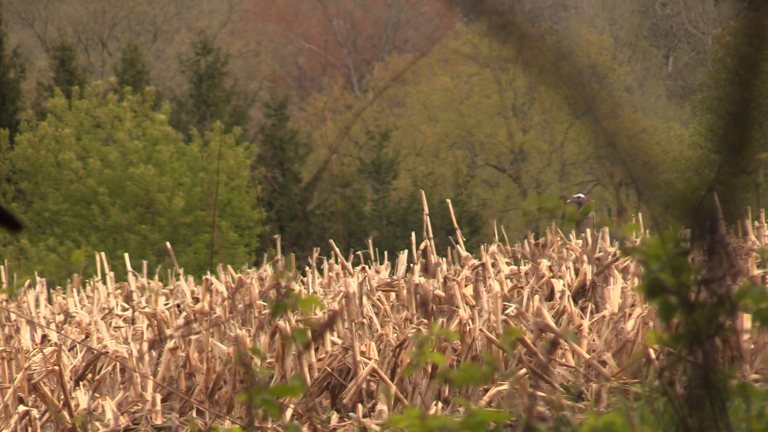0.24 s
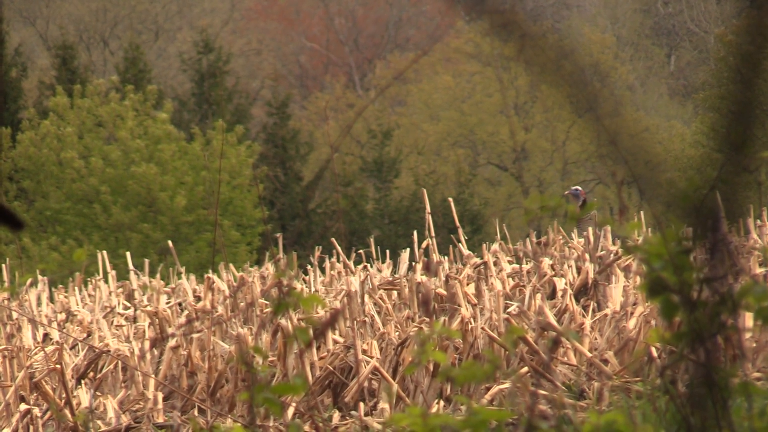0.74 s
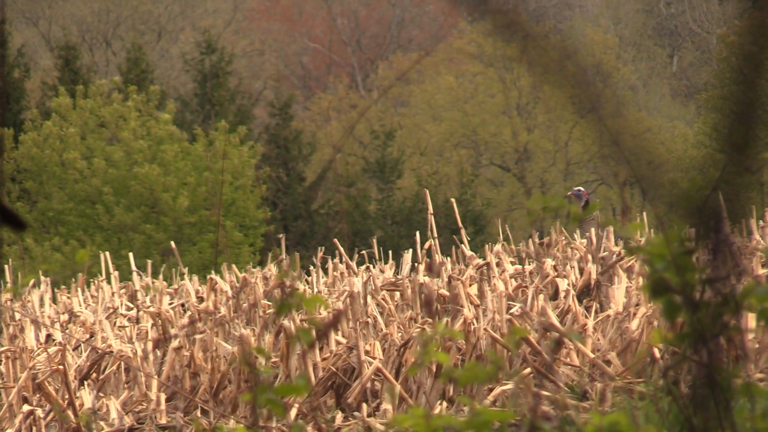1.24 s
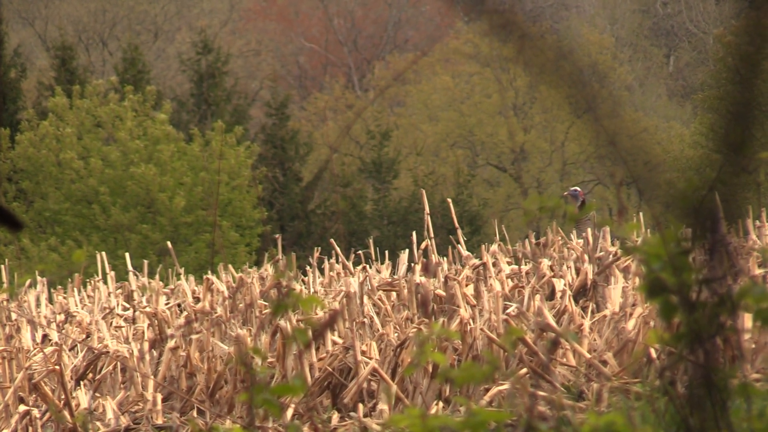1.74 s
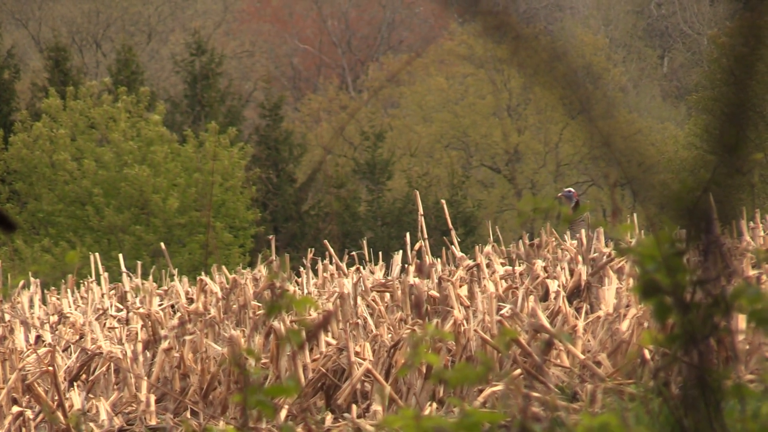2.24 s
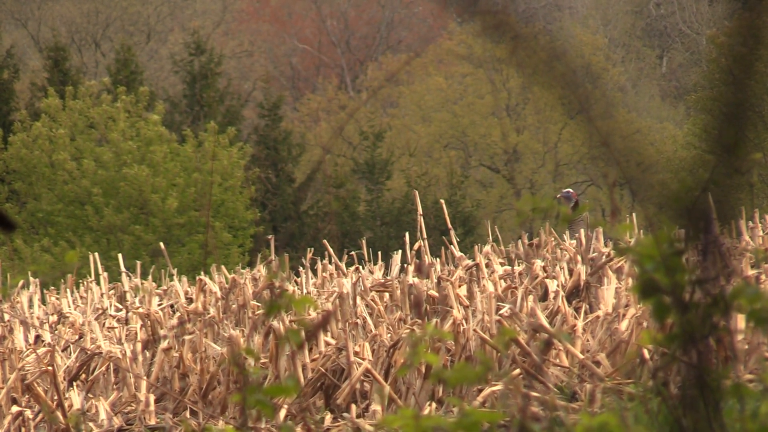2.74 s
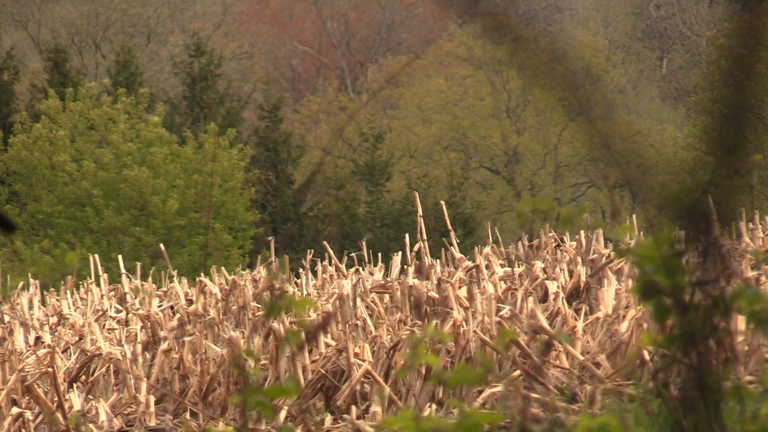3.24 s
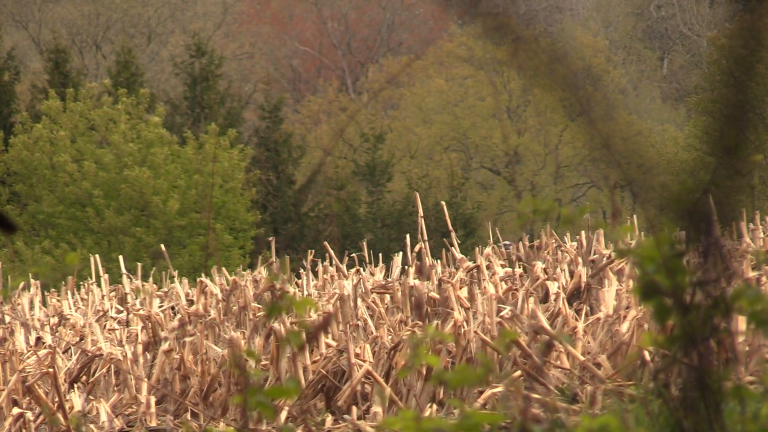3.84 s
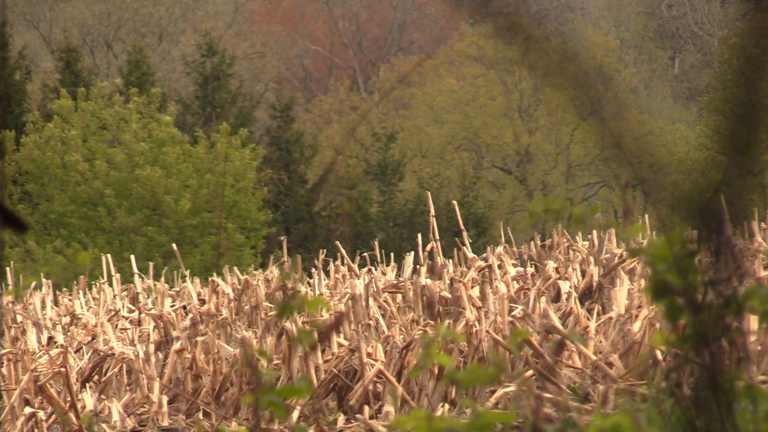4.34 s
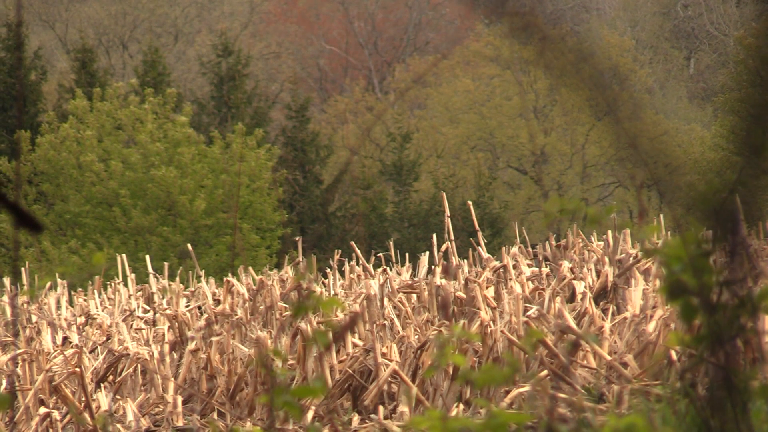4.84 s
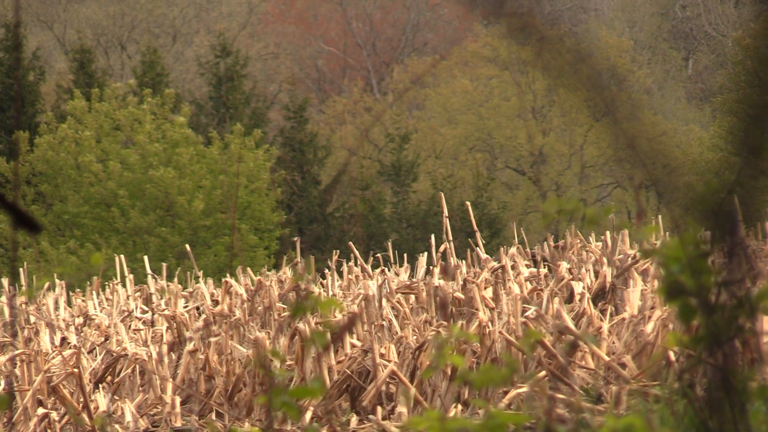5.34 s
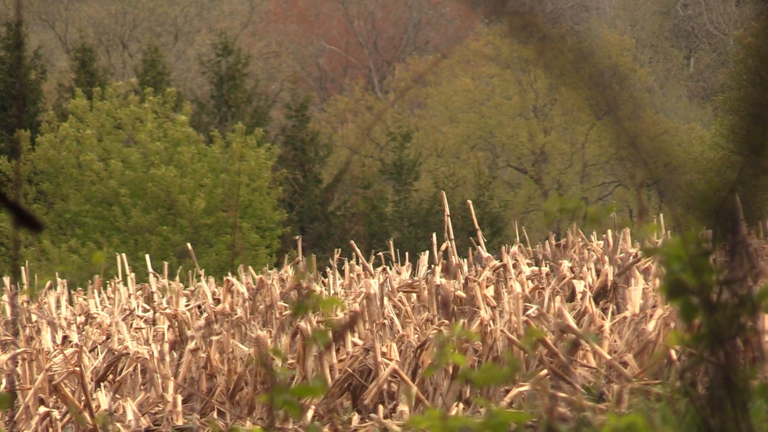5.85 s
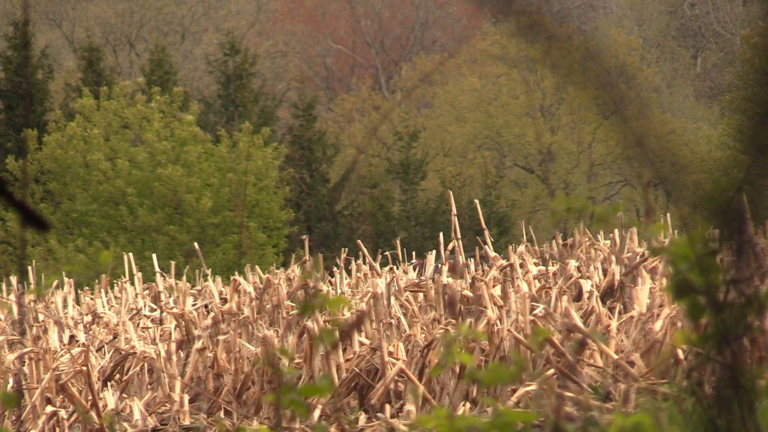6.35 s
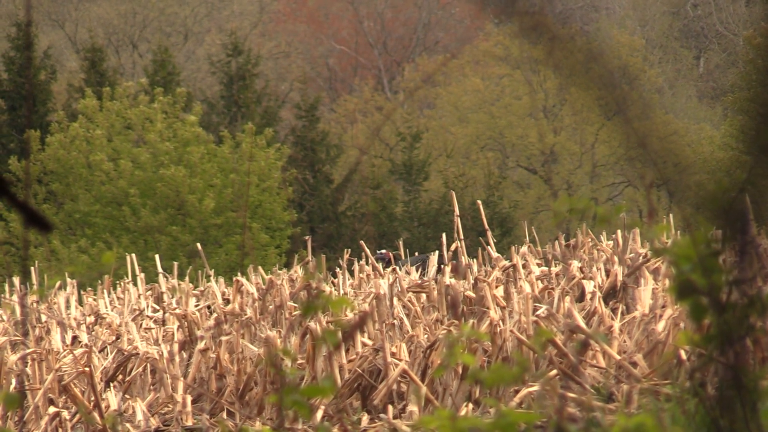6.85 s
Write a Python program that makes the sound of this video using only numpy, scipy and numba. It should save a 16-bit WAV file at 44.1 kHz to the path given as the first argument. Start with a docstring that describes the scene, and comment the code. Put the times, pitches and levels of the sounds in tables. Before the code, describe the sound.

Four quick, reedy turkey yelps, nasal and abruptly clipped, are made close to the microphone in open country, with a slight dull echo from trees. Then only soft distant rumble, faint hum and thin far chirps. A cluster of crackles and soft wet clicks precedes a short fluttering rattle; after another pause and more smacks comes a longer, harsher rattle. The background drops during calls and slowly returns afterwards.

```python
"""The edge of a corn field, with a hunter's turkey mouth call close by: four short yelps, two rattling purrs.
A membrane sings near 700 Hz into a throat that favours its octave; pushed, it breaks into two lines.
Far traffic and a motor hum fill the gaps, with dry crackles, wet smacks and two far bird chirps.
A gain control ducks the background at each call and lets it creep back."""
import sys
import numpy as np
from scipy import signal
from scipy.fft import rfft, irfft, next_fast_len
from scipy.io import wavfile
from scipy.ndimage import uniform_filter1d
from numba import njit

SR = 44100
rng = np.random.default_rng(int(sys.argv[2]) if len(sys.argv) > 2 else 0)


def unload_audio(sound):
    """Save the sound as a 16-bit wav file, at the path given as the first command line argument."""
    columns = np.transpose(np.atleast_2d(sound))
    # keep every value between -1 and 1, then stretch to whole-number steps
    steps = np.round(np.clip(columns, -1, 1) * 32767)
    wavfile.write(sys.argv[1], SR, steps.astype(np.int16))


N = 313110
TIME = np.arange(N) / SR


def undb(db):
    """Decibels to amplitude."""
    return 10 ** (np.asarray(db) / 20)


def level(x, db):
    """Scale a signal to an RMS level in dB."""
    return x * undb(db) / np.sqrt(np.mean(x ** 2))


def shape(x, gain):
    """Filter by a gain that is a function of frequency."""
    size = next_fast_len(len(x))
    hz = np.arange(size // 2 + 1) * SR / size + 1  # 1 Hz up, to keep clear of zero
    return irfft(rfft(x, size) * gain(hz), size)[:len(x)]


def points(table):
    """Gain drawn through (Hz, dB) points on a logarithmic frequency scale."""
    hz, db = np.transpose(table)
    return lambda f: undb(np.interp(np.log(f), np.log(hz), db))


def modes(table):
    """Gain of parallel resonances, each a bell around its centre."""
    return lambda f: sum(undb(db) / (1 + (2 * (f - hz) / width) ** 2) ** 1.3 for hz, width, db in table)


def walk(rate):
    """Random levels held 1 / rate s and slewed twice; spread 1."""
    k = int(SR / rate)
    steps = np.repeat(rng.standard_normal(N // k + 1), k)
    x = uniform_filter1d(uniform_filter1d(steps, k), k)[:N]
    return x / x.std()


def curve(s, values, smooth_s=.002):
    """Straight lines between breakpoints, with rounded corners."""
    return uniform_filter1d(np.interp(TIME, s, values), int(smooth_s * SR))


# relative spectrum of the far rumble and hiss: pitch_hz, density_db (per Hz)
FIELD_SPECTRUM = [(12, -48.5), (20, -19.5), (70, 1), (87, -0.5), (132, -7), (189, -9), (223, -18.5),
                  (310, -13), (445, -19.5), (511, -16.5), (1460, -37), (8860, -44.5), (10800, -43),
                  (13100, -47.5), (15000, -82.5)]
# swell of far traffic: time_s, swell_db
TRAFFIC_SWELL = [(0, 0), (1.1, -1.5), (2.5, -2), (4.2, 1), (5.1, -1), (5.8, 2.5), (7.1, -2)]
FIELD_DB = -62.5  # RMS before the swells


def field():
    """Far traffic: noise cut into bands whose levels swell apart."""
    noise = level(shape(rng.standard_normal(N), points(FIELD_SPECTRUM)), FIELD_DB)
    swell_db = curve(*np.transpose(TRAFFIC_SWELL))
    out = np.zeros(N)
    # low Hz, high Hz, share of the traffic swell
    for lo, hi, share in [(0, 60, 1), (60, 140, 1), (140, 400, 1), (400, 1500, .5), (1500, SR, 0)]:
        band = shape(noise, lambda f: (f > lo) & (f <= hi))
        out += undb(share * swell_db + 1.6 * walk(3.1)) * band
    return out


# level of the motor hum around which it wavers: time_s, level_db
MOTOR_LEVEL = [(0, -98), (1.1, -79), (2.3, -70.5), (3.0, -72), (3.9, -66.5), (4.6, -69.5), (5.2, -85),
               (7.1, -93)]
MOTOR_HZ = 191.3


def motor():
    """A motor hum: one sine that wavers in pitch and level."""
    phase = 2 * np.pi * np.cumsum(MOTOR_HZ * (1 + 0.004 * walk(0.91))) / SR
    return np.sqrt(2) * np.sin(phase) * undb(curve(*np.transpose(MOTOR_LEVEL)) + 1.4 * walk(3.5))


def add_ring(out, s, db, hz, t60):
    """Add a struck ring that dies away by 60 dB in t60 seconds."""
    t = TIME[:SR // 8]
    # a wandering phase turns the ring into a crackle, more so in the treble
    wander = np.cumsum(rng.standard_normal(len(t))) * hz / 15000
    onset = 1 - np.exp(-t * hz * 11.6)
    ring = np.sin(2 * np.pi * hz * t + wander) * undb(-60 * t / t60) * onset
    out[int(s * SR):][:len(t)] += undb(db) * ring


# dry crackles: time_s, level_db, pitch_hz
CRACKLE_HITS = [(.99, -59, 910), (2.315, -65.5, 2510), (3.81, -65, 4050), (4.232, -53.5, 2570),
                (4.245, -58.5, 1200), (4.263, -57, 1730), (4.268, -53.5, 3600), (4.272, -54, 6000),
                (4.283, -54, 4340), (4.42, -55, 4040), (4.481, -65, 1780), (4.504, -63, 1490),
                (4.518, -62, 4030)]
CRACKLE_CYCLES = 20  # to die away by 60 dB


def crackles():
    """Dry crackles: single rings that last a fixed number of cycles."""
    out = np.zeros(N)
    for s, db, hz in CRACKLE_HITS:
        add_ring(out, s, db, hz, CRACKLE_CYCLES / hz)
    return out


# the mouth resonance moves with the tongue: time_s, centre_hz
MOUTH_PATH = [(1.13, 3950), (1.45, 4238), (1.76, 3917), (2.07, 3866), (4.74, 3639), (4.8, 3688),
              (4.9, 3252), (5.0, 3360), (6.25, 2838), (6.35, 3050), (6.55, 3028), (6.59, 3480),
              (6.85, 3236)]
MOUTH_WIDTH_HZ = 190


def mouth(x):
    """Moving resonance: shift its centre to zero, low-pass, shift back."""
    turn = 2 * np.pi * np.cumsum(curve(*np.transpose(MOUTH_PATH))) / SR
    out = np.zeros(N)
    for wave in (np.cos(turn), np.sin(turn)):
        out += wave * shape(x * wave, lambda f: 1 / (1 + (2 * f / MOUTH_WIDTH_HZ) ** 2))
    return out


THROAT_TOP_HZ = 1670


def membrane(hz, multiple, low, upper, treble, rough, colour, mouth_db,
             wobble=0.048, flutter_db=14.0, air=.15, chaos=2.5):
    """Low line, upper line and a buzz of overtones; roughness shakes pitch, chokes cycles, swaps buzz for hiss."""
    step = 2 * np.pi * hz / SR
    slow = np.cumsum(step * (1 + wobble * rough * walk(700)))
    fast = np.cumsum(step * multiple * (1 + wobble * rough * walk(700)))
    lines = low * undb(-flutter_db * rough * walk(350) ** 2) * np.sin(slow)
    # the throat lets little through above its first resonance
    passed = upper / np.sqrt(1 + (hz * multiple / THROAT_TOP_HZ) ** 16)
    lines += passed * undb(-flutter_db * rough * walk(350) ** 2) * np.sin(fast)
    buzz = level(sum(np.cos(k * fast / 2 + k * k) for k in range(3, 19)), 0)
    # air puffs in step with the low line
    hiss = level(rng.standard_normal(N) * (1 + np.cos(slow)), 0)
    hiss_share = np.clip(air + chaos * rough, 0, 1)
    source = np.sqrt(1 - hiss_share) * buzz + np.sqrt(hiss_share) * hiss
    coloured = level(shape(source, colour), 0) + level(mouth(source), mouth_db)
    return np.sqrt(2) * lines + treble * coloured


# one row a yelp, times counted from its start, levels before the shaping below: start_s, attack_s, leap_s,
# end_s, pre_leap_hz, leap_hz, locked_hz, octave_db, low_line_db, treble_db, closing_peep_db,
# roughness until the note locks (0-1, on top of a little throughout)
YELP_NOTES = [(1.127, 0.013, .020, .050, 645, 725, 721, -5.5, -18.5, -31, -52.5, 0.1),
              (1.431, .015, .021, 0.065, 689.3, 784, 730.6, -9.5, -23.5, -38.5, -49, 0.1),
              (1.739, .013, .029, .067, 725, 820, 769.6, -9, -19.5, -35, -38.5, .25),
              (2.035, .011, 0.033, 0.064, 700, 950, 757, -14, -18.5, -38, -36.5, .35)]
# relative treble colour of the yelps: pitch_hz, gain_db
YELP_SPECTRUM = [(1060, -24), (1800, -0.5), (2350, -1.5), (2930, -6), (4410, 0), (5860, -17.5),
                 (6460, -16.5), (7710, -19), (8810, -10.5), (10300, -27), (11900, -18.5), (14000, -35.5),
                 (15000, -65)]
# cracks, where the two lines draw together and turn rough: time_s, length_s, low_line_db
YELP_CRACKS = [(1.757, .010, -14), (2.05, .014, -15)]
CRACK_HZ, CRACK_MULTIPLE, CRACK_ROUGH, YELP_ROUGH = 1061, 1.1, 0.64, 0.05
LEAP_S, SETTLE_S, SETTLE_HZ_PER_S, END_SAG = .006, .005, 33000, 0.87
PEEP_AFTER_S, PEEP_S, PEEP_HZ, PEEP_ROUGH = .011, .004, 942, .5
PEEP_HISS_DB, PEEP_HISS_S = -25, .012  # air that trails off after a yelp, below its treble
LOW_START_DB, STOP_S = -18, 0.0054
OCTAVE_RISE, OCTAVE_FADE, TREBLE_RISE, TREBLE_FADE = 2.4, 0.9, 2.0, 1  # exponents of the ramps
# change of octave and low line per doubling of pitch above the locked note
LEAP_CHOKE_DB, LEAP_LIFT_DB = -48.5, 12.5


def yelps():
    """Each yelp starts on the octave, may crack, leaps in pitch, then locks and fades from the top."""
    pitch = []
    low, upper, treble, peep, rough, locked = np.zeros((6, N))
    for (s, attack, leap, end, start_hz, leap_hz, hz,
         octave_db, low_db, treble_db, peep_db, harsh) in YELP_NOTES:
        lock = leap + SETTLE_S + (leap_hz - hz) / SETTLE_HZ_PER_S
        pitch += [(s + leap - LEAP_S, start_hz), (s + leap, leap_hz),
                  (s + lock, hz), (s + end - STOP_S, hz), (s + end, END_SAG * hz),
                  (s + end + PEEP_AFTER_S / 2, PEEP_HZ), (s + end + 3 * PEEP_AFTER_S, PEEP_HZ)]
        t = TIME - s
        ramp = np.clip(t / attack, 0, 1)
        rise, stop = ramp ** OCTAVE_RISE, np.clip((end - t) / STOP_S, 0, 1)
        left = np.clip((end - t) / (end - lock), 0, 1)
        low += undb(low_db + LOW_START_DB * np.clip(1 - t / leap, 0, 1)) * rise * stop
        upper += undb(octave_db) * rise * left ** OCTAVE_FADE
        trail = undb(PEEP_HISS_DB) * (t > lock) * np.exp(-np.maximum(t - end, 0) / PEEP_HISS_S)
        treble += undb(treble_db) * (ramp ** TREBLE_RISE * left ** TREBLE_FADE + trail)
        rough += harsh * (t > 0) * np.clip((lock - t) / SETTLE_S, 0, 1)
        locked += hz * (t > 0) * (t < end)
        peep += undb(peep_db) * np.exp(-.5 * ((t - end - PEEP_AFTER_S) / PEEP_S) ** 2)
    hz = curve(*np.transpose(pitch))
    # above its locked note the membrane loses the octave and feeds the low line
    octaves_over = np.log2(np.maximum(hz / np.where(locked > 0, locked, hz), 1))
    low = low * undb(LEAP_LIFT_DB * octaves_over)
    upper = upper * undb(LEAP_CHOKE_DB * octaves_over)
    cracks = np.array([np.cos(np.pi * np.clip((TIME - s) / length, -.5, .5))
                       for s, length, db in YELP_CRACKS])
    low = np.maximum(low, undb(np.array(YELP_CRACKS)[:, 2]) @ cracks)
    crack = cracks.sum(axis=0)
    rough = YELP_ROUGH + np.maximum(rough, CRACK_ROUGH * crack) + PEEP_ROUGH * (locked == 0)
    hz = hz + (CRACK_HZ - hz) * crack
    multiple = 2 + (CRACK_MULTIPLE - 2) * crack
    return membrane(hz, multiple, low + peep, upper, treble, rough, points(YELP_SPECTRUM),
                    mouth_db=-11.0, flutter_db=13.5, air=0.12, chaos=1.2)


def air_thumps(yelp, purr):
    """Each push of air thumps the microphone far below the call: the call's power, band-passed low."""
    push = undb(2.0) * yelp ** 2 + undb(16.5) * purr ** 2
    return undb(-15.5) * shape(push, lambda f: 1 / (1 + (f / 250) ** 2) / (1 + (32 / f) ** 2))


def smear(calls, tail):
    """Spread the calls over a noise tail of unit energy."""
    return signal.fftconvolve(calls, tail / np.sqrt(np.sum(tail ** 2)))[:N]


BRUSH_DB, BRUSH_T60_S = -29, 0.13


def brush_smear(calls):
    """The brush close by smears the end of every note with a short decaying noise tail."""
    t = TIME[:SR // 8]
    tail = rng.standard_normal(len(t)) * undb(-60 * t / BRUSH_T60_S) * (t > .004)
    return undb(BRUSH_DB) * smear(calls, tail)


ECHO_DB, ECHO_T60_S = -59.5, .9


def tree_echo(calls):
    """The tree line sends back a faint, dull tail of low-passed, decaying noise."""
    t = TIME[:SR]
    tail = rng.standard_normal(SR) * undb(-60 * t / ECHO_T60_S) * (t > .015)
    return undb(ECHO_DB) * smear(calls, shape(tail, lambda f: 1 / (1 + (f / 2500) ** 2)))


# wet smacks near the microphone: time_s, level_db, upper_ring_db (added above 2 kHz)
SMACK_HITS = [(2.393, -49.5, 4.5), (4.235, -39.5, -7.5), (4.251, -43, -9), (4.683, -40.5, -20),
              (5.097, -45, -2), (6.044, -50, -15), (6.081, -46, -25), (6.138, -45.5, -14),
              (6.162, -41.5, -15), (6.19, -36.5, -20), (6.911, -50, 3)]
# rings that make up every smack: pitch_hz, relative_db, t60_s
SMACK_RINGS = [(336, -2.5, 0.028), (750, -5.5, 0.0087), (2490, -28.5, .05), (4100, -21.5, .07)]


def smacks():
    """Wet smacks: four damped rings struck together."""
    out = np.zeros(N)
    for s, db, upper_db in SMACK_HITS:
        for hz, ring_db, t60 in SMACK_RINGS:
            add_ring(out, s, db + ring_db + upper_db * (hz > 2000), hz, t60)
    return out


# a small bird far off: start_s, length_s, start_hz, end_hz, peak_db
BIRD_CHIRPS = [(2.486, 0.052, 6500, 7330, -74), (4.188, 0.035, 6430, 7000, -77)]


def bird():
    """Two thin rising chirps, gliding sines smeared by a leafy noise tail."""
    chirps = np.zeros(N)
    for s, length, start_hz, end_hz, db in BIRD_CHIRPS:
        u = np.clip((TIME - s) / length, 0, 1)
        phase = 2 * np.pi * np.cumsum(start_hz + (end_hz - start_hz) * u) / SR
        chirps += undb(db) * np.sin(np.pi * u) * np.sin(phase)
    leaves = rng.standard_normal(SR // 4) * undb(-60 * TIME[:SR // 4] / 0.5)
    return chirps + 0.037 * signal.fftconvolve(chirps, leaves)[:N]


# one row a beat of the purr, times counted from its opening, levels before the shaping below:
# opening_s, squeeze_s, length_s, squeeze_db, opening_db, octave_db, squeeze_hz
PURR_BEATS = [(4.737, 0.0055, .014, -30, -32, -30.5, 619.4), (4.7639, .011, .017, -23, -27, -28, 890.6),
              (4.7996, .010, .021, -23, -24.5, -26, 942), (4.8336, .008, .011, -21, -24, -24, 994.7),
              (4.8464, .007, .011, -22, -25.5, -29.5, 949), (4.8714, .006, .018, -17.5, -29, -25, 1042),
              (4.9024, .008, 0.019, -15.5, -28, -25, 999.7), (4.9322, .006, .019, -17, -28.5, -22.5, 975.6),
              (4.9654, 0.0055, .017, -18.5, -33.5, -26, 946), (5.0038, 0.0069, .014, -36, -36.5, -35, 760),
              (6.206, .004, .012, -40, -45, -47.5, 587.4), (6.2327, .010, .015, -30, -31, -36, 840),
              (6.2646, .010, .016, -27.5, -24, -38, 859.7), (6.2938, .010, .020, -28.5, -22, -39, 915.3),
              (6.326, .008, .019, -22, -23, -37, 1014), (6.3619, 0.0065, .016, -19.5, -24.5, -28, 1082),
              (6.4, .006, .015, -20.5, -24, -28, 1041), (6.4304, .005, .019, -20.5, -21, -27, 1095),
              (6.465, .004, .016, -18.5, -24, -23, 1058), (6.4978, .005, .014, -17.5, -22.5, -25, 1050),
              (6.5293, .005, .017, -19.5, -30.5, -30, 948), (6.556, .004, .0156, -26, -24.5, -33, 912.6),
              (6.587, .004, .0114, -22, -38.5, -36.5, 852), (6.6084, 0.0041, .018, -23, -23.5, -27, 802),
              (6.6358, 0.0056, .0175, -22, -31, -25.5, 858.6),
              (6.6656, 0.0035, 0.014, -22.5, -25, -26.5, 866.4),
              (6.6963, 0.0068, 0.0092, -19, -29, -29.5, 890.5), (6.72, .005, .015, -20.5, -37, -26.5, 885),
              (6.749, 0.0041, .014, -21, -29.5, -28, 873), (6.7767, .005, 0.015, -22, -27, -27.5, 933),
              (6.802, .006, .018, -22.5, -31, -29, 886), (6.8346, .004, 0.011, -24.5, -25.5, -35, 829)]
# along the purrs: time_s, opening_hz (on which the beats open), roughness (0-1)
PURR_OPENING = [(4.739, 603.8, 0.2), (4.8, 640.3, .2), (4.85, 677.7, 0.4), (4.9, 672.4, .12),
                (5.0, 664.5, .1), (6.2, 555, .12), (6.301, 650, .15), (6.33, 688.2, .42),
                (6.402, 740.7, .48), (6.53, 677, 0.6), (6.561, 664.6, .15), (6.65, 621.5, .15),
                (6.842, 639, .15)]
# relative throat resonances in the purr: centre_hz, width_hz, gain_db
PURR_RESONANCES = [(1175, 3100, 7), (2120, 2400, 0), (3010, 610, -6.5), (5470, 450, -16),
                   (6900, 3000, -25.5), (8400, 550, -14), (10480, 670, -13), (12420, 750, -9)]
# a fixed resonance higher in the head: centre_hz, width_hz, gain_db
NASAL_RESONANCE = (4500, 450, -6)
RISE_S, OCTAVE_S = 0.0072, 0.0022
HOLD = .35  # share of the way to the squeeze for which the opening note keeps its pitch
SAG_AT = 0.8  # share of the way from squeeze to close
SQUEEZE_SAG, CLOSE_SHARE = 0.98, .4  # pitch ratio, share of the way from opening to squeeze pitch
GAP_DB, CLOSE_DB = -26.5, -8  # relative to the squeeze
SWELL_DB, SQUEEZE_TREBLE_DB = 2.2, 3.5  # lift in mid-squeeze
PURR_OCTAVE_DB, SLIDE_DB, CLOSING_OCTAVE_DB = -21, 16, -9.5  # base, per unit roughness, at the close
PURR_TREBLE_DB, STRAIN_TREBLE_DB = -33, 10.5  # base, per unit roughness
OCTAVE_SLIDE = 1.6  # fall of the upper line's multiple per unit roughness
UNDER_DB = -7.0


def purrs():
    """Every beat opens low with a strong octave, is squeezed up in pitch and sags as it closes."""
    start, squeeze, length, squeeze_db, open_db, octave_db, top_hz = np.transpose(PURR_BEATS)
    # columns: rise begins, opening, squeeze, sag, close
    s = start[:, None] + np.column_stack(
        [0 * start, 0 * start, squeeze, squeeze + SAG_AT * (length - squeeze), length])
    after_last_close = np.append(0, s[:-1, 4]) + .002
    s[:, 0] = np.minimum(np.maximum(start - RISE_S, after_last_close), start - .002)
    when, pitch, roughness = np.transpose(PURR_OPENING)
    open_hz = np.interp(start, when, pitch)
    strain = np.interp(start, when, roughness).clip(0, .6)
    close_hz = open_hz + CLOSE_SHARE * (top_hz - open_hz)
    hz = np.column_stack([open_hz, open_hz, top_hz, SQUEEZE_SAG * top_hz, close_hz])
    db = np.column_stack([squeeze_db + GAP_DB, open_db, squeeze_db, squeeze_db, squeeze_db + CLOSE_DB])
    gate, octave, swell = np.zeros((3, N))
    for k in range(len(s)):
        gate[int(s[k, 0] * SR):int((s[k, 4] + .012) * SR)] = 1
        octave += undb(octave_db[k]) * np.exp(-.5 * ((TIME - s[k, 1]) / OCTAVE_S) ** 2)
        swell += np.sin(np.pi * np.clip((TIME - s[k, 2]) / (s[k, 3] - s[k, 2]), 0, 1))
    # after the last beat of a run the membrane stops within a few cycles
    last = np.append(np.diff(start) > .1, True)
    ends = s[last, 4] + 0.0046
    times = np.append(s, ends)
    order = np.argsort(times)
    low = curve(times[order], np.append(undb(db), 0 * ends)[order]) * curve(TIME, gate)
    low *= undb(SWELL_DB * swell)
    rough = curve(s[:, 2], strain)
    # in rough beats the octave slides down into the squeezed note
    multiple = np.full(s.shape, 2.)
    multiple[:, 2:4] -= OCTAVE_SLIDE * strain[:, None]
    closing = curve(s.ravel(), np.tile([1, 0, 0, 1, 1], len(s)))
    upper = octave + undb(PURR_OCTAVE_DB + SLIDE_DB * rough + CLOSING_OCTAVE_DB * closing) * low
    drive = curve(TIME, low * undb(SQUEEZE_TREBLE_DB * swell) + 0.76 * octave, 0.003)
    treble = undb(PURR_TREBLE_DB + STRAIN_TREBLE_DB * rough) * drive
    # in rough beats the opening note keeps sounding under the squeezed one
    held = np.sin(2 * np.pi * np.cumsum(curve(s[:, 1], hz[:, 1])) / SR)
    under = undb(UNDER_DB) * np.clip(rough - .15, 0, 1) * low * held
    pitch_s = s.copy()
    pitch_s[:, 1] += HOLD * (s[:, 2] - s[:, 1])
    return under + membrane(curve(pitch_s.ravel(), hz.ravel()), curve(s.ravel(), multiple.ravel()),
                            low, upper, treble, rough, modes(PURR_RESONANCES + [NASAL_RESONANCE]),
                            mouth_db=-6.0, air=0.6, chaos=1.6, wobble=.05, flutter_db=3.0)


def scene():
    """Mix calls, their surroundings and the background, with a faint flickering stereo side."""
    yelp, purr = yelps(), purrs()
    calls = yelp + purr
    mono = calls + brush_smear(calls) + tree_echo(calls) + air_thumps(yelp, purr)
    mono += field() + motor() + crackles() + smacks() + bird()
    side = undb(-37) * np.roll(mono, 30) * walk(40)
    return np.array([mono + side, mono - side])


@njit
def ride(want, start, top, attack, release):
    """Gain in dB drops fast, creeps back slowly and stops at its top."""
    out, g = np.empty(len(want)), start
    for i in range(len(want)):
        g = min(top, g + (want[i] - g) * (attack if want[i] < g else release))
        out[i] = g
    return out


GAIN_MAX_DB, GAIN_START_DB, GAIN_KNEE_DB, GAIN_SLOPE, GAIN_PULL_DB = 12, 7, -33, 0.64, 4
ATTACK_S, RELEASE_S, SENSE_HZ = 0.0068, 0.69, 1200
CEILING, TOP_HZ = .74, 15235


def record(dry):
    """Gain control that hears mostly the upper range, a soft ceiling and a steep top cut."""
    sensed = shape(dry.mean(axis=0), lambda f: 1 / np.sqrt(1 + (SENSE_HZ / f) ** 8))
    loud_db = 10 * np.log10(uniform_filter1d(sensed ** 2, 200).clip(1e-12))
    over_db = loud_db - GAIN_KNEE_DB
    # in quiet the gain is pulled past its top, so it gets there in good time
    want = np.where(over_db > 0, GAIN_MAX_DB - GAIN_SLOPE * over_db, GAIN_MAX_DB + GAIN_PULL_DB)
    gain_db = ride(want, GAIN_START_DB, GAIN_MAX_DB, 1 / (ATTACK_S * SR), 1 / (RELEASE_S * SR))
    wet = dry * undb(gain_db)
    wet = wet / (1 + np.abs(wet / CEILING) ** 12) ** (1 / 12)
    return signal.sosfilt(signal.ellip(10, .2, 70, TOP_HZ, fs=SR, output="sos"), wet)


dry = scene()
out = record(dry)
unload_audio(out)
```